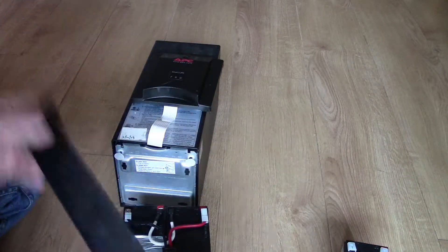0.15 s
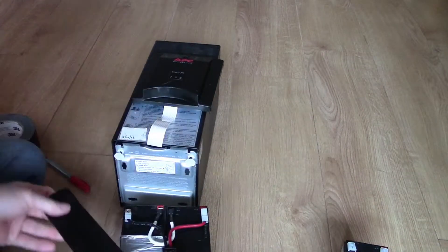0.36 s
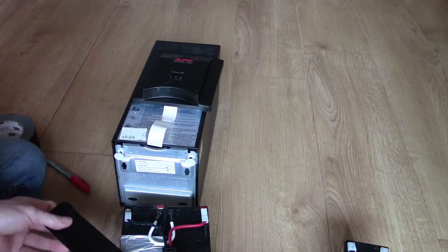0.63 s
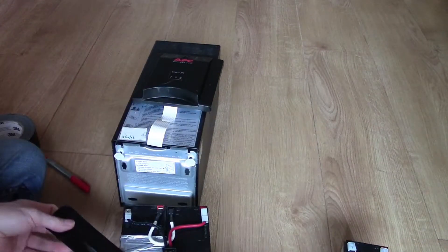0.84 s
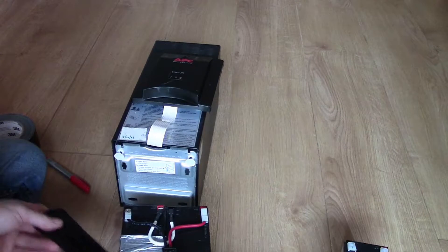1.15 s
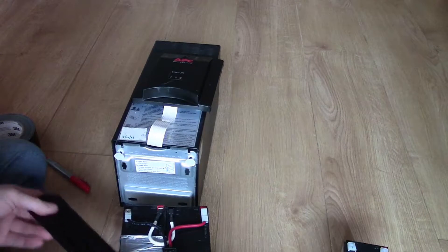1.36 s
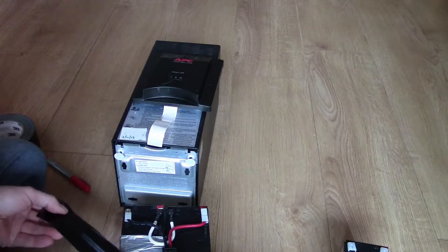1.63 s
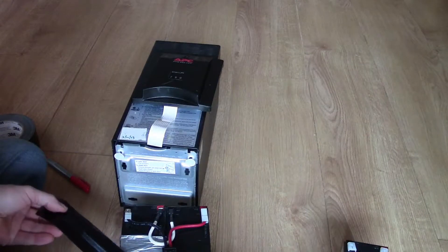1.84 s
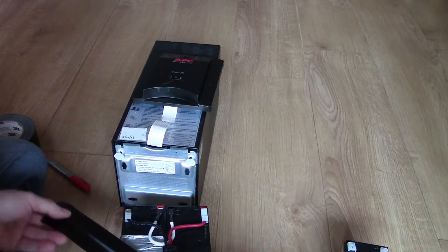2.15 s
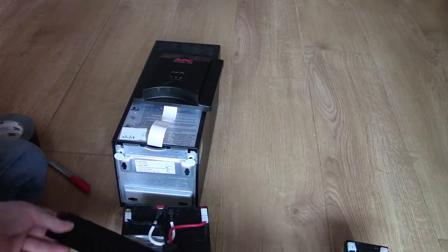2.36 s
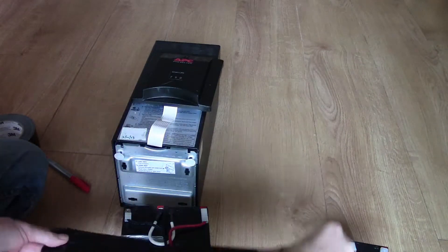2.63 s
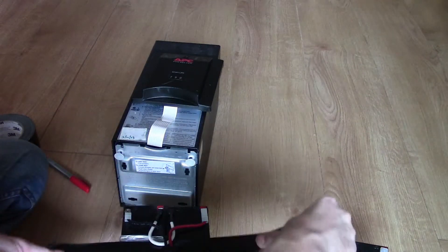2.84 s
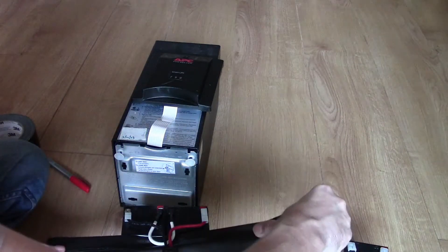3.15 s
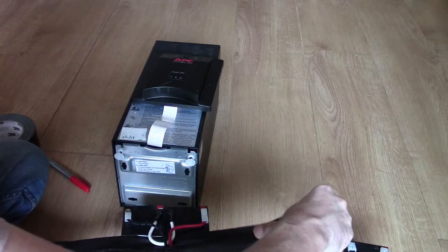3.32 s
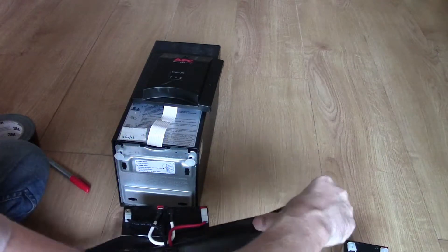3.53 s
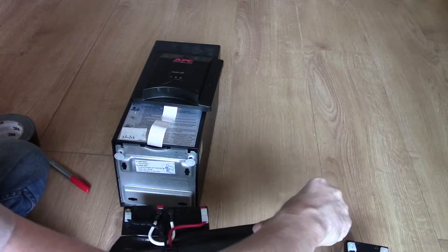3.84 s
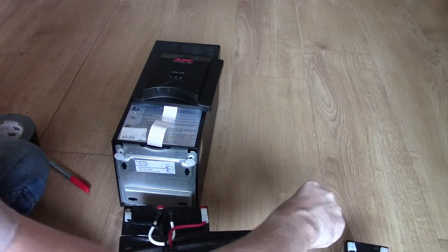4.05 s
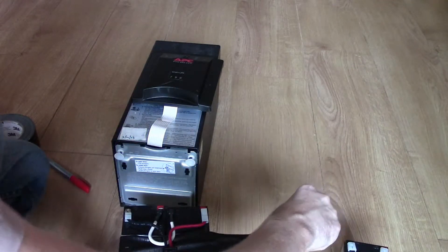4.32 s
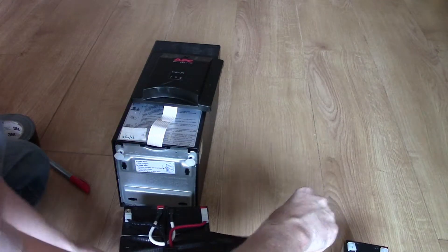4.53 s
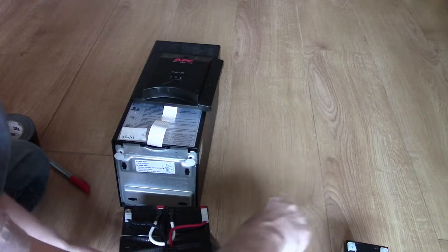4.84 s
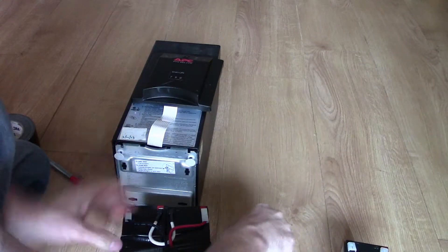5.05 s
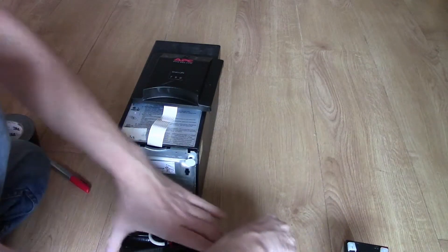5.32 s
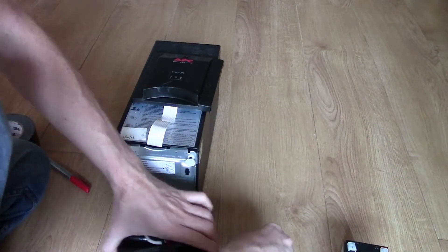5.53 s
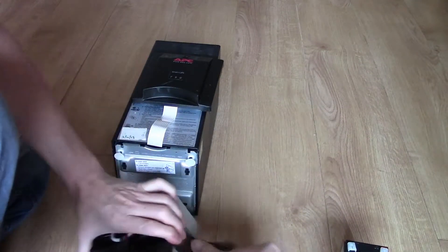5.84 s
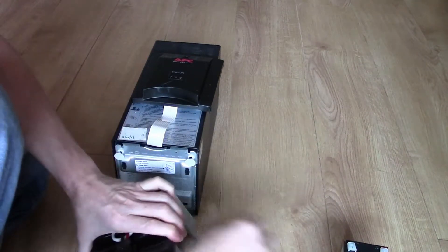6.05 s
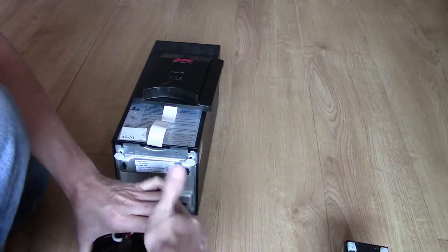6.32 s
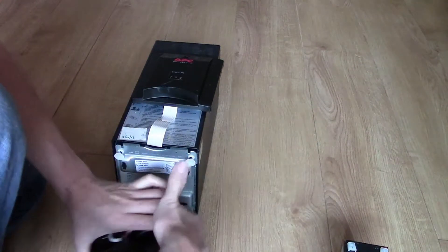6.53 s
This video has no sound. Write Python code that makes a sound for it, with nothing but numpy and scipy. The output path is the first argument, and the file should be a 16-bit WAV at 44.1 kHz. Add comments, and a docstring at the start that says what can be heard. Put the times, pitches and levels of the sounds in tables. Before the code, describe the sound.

A close stereo microphone in a bare room with a short, sparse echo and quiet, slightly patchy hiss. At 0.03 s a small bright tape snap with a light tap, then soft rustling near 0.2 s and a faint falling skin squeak at 0.75 s. At 1.18 s a sharp tick, and at 1.23 s by far the loudest event: a hard, clipped crack with a hollow plastic knock, ringing off the walls. A faint squeak at 1.75 s, then airy tape sliding from 1.8 to 2.8 s, with a click at 2.43 s. Quiet sparse ticks follow. Between 4.27 and 4.6 s come clustered snaps and a brisk rustle. From 5.45 s pressing brings small clicks, dull rubs and low knocks, with a stronger double snap at 5.91 s. Two tiny squeaks at 6.44 and 6.57 s and soft knocks at 6.66 s end it.

```python
"""Sticky tape pulled taut lets go in snaps: each release is a wide crack that excites a ring in the tape.
Hands press it round a plastic pack: the drawn strip whistles with friction, skin sticks and slips,
dense tiny releases rustle over a dull rub, and knocks sound the short modes of the hollow plastic.
A bare room answers with a decaying tail of sparse echoes, over a quiet, gently patchy stereo hiss."""
import sys
import numpy as np
from scipy import signal
from scipy.fft import rfft, irfft
from scipy.io import wavfile
from scipy.ndimage import uniform_filter1d

SR = 44100
rng = np.random.default_rng(int(sys.argv[2]) if len(sys.argv) > 2 else 0)


def digitize_waveform(pressure):
    """Quantize a signal to 16-bit integers and store it at the path in sys.argv[1].

    Rows of a 2-D input are taken as channels; values are limited to [-1, 1].
    """
    field = np.atleast_2d(pressure).T
    bounded = np.clip(field, -1, 1)
    quanta = np.round(bounded * 32767).astype(np.int16)
    wavfile.write(sys.argv[1], SR, quanta)


N = 294588

# Glue letting go: start_s, peak_db, tape_pitch_hz, crack_re_ring_db, t60_ms; the row at 0.033 s is no release
# but the long 1080 Hz ring of the first knock on the pack
GLUE_SNAPS = [(0.0275, -20.5, 3190, -13, 5.9), (0.033, -39, 1080, -21, 77), (0.222, -39, 2470, -5, 13),
              (0.512, -36, 7300, -2, 13), (0.7238, -39.5, 7540, -5, 11), (0.7343, -36, 7200, -5, 11),
              (0.8418, -37, 2600, 3, 9), (1.016, -37, 3140, 0, 9.7), (1.0528, -36.5, 7600, -2, 20),
              (1.106, -30.5, 8250, 2, 13), (1.18, -12, 7350, 11, 12), (1.2026, -39, 4400, -3, 11),
              (1.2314, -0.5, 3240, 7, 13.4), (1.2361, -4.5, 2650, -13, 19), (2.1053, -34.5, 7800, 0, 24),
              (2.1676, -39.5, 7950, -3, 20), (2.3628, -32.5, 6670, 8, 10), (2.422, -28, 3400, -3, 12),
              (2.435, -19, 2680, -0.5, 8.4), (2.6802, -36.5, 3800, 15, 20), (3.0462, -36, 6440, 6, 17),
              (3.2, -36.5, 4080, -0.5, 23), (3.3319, -36, 3400, 10, 12), (3.3973, -33.5, 2670, 12, 20),
              (3.4235, -31.5, 2600, 15, 11), (3.6772, -37, 3460, 1, 18), (3.697, -36.5, 4300, 1.5, 25),
              (3.9213, -32.5, 3660, 4.5, 11), (3.9694, -40, 8200, -6, 12), (4.242, -38.5, 3640, 8, 18),
              (4.2629, -33, 2400, 6, 25), (4.271, -16, 2320, 1.5, 17), (4.2822, -28, 2400, -5, 55),
              (4.29, -27, 2450, 3, 26), (4.305, -26, 2400, -4, 13), (4.3089, -14, 2370, -5, 22),
              (4.4896, -33, 2760, -3, 23), (4.494, -26, 2700, -20, 13), (4.5007, -19, 5740, -3, 11),
              (4.5035, -17, 3070, -8.5, 7.3), (4.511, -19, 2650, -9, 6.2), (4.585, -33.5, 2700, -2, 18),
              (4.6001, -26.5, 2520, 4, 24), (4.6138, -28.5, 2500, 3, 16), (4.8012, -44, 2250, -1, 17),
              (4.8876, -40.5, 7500, 4, 25), (4.9956, -35.5, 7500, 12, 7.2), (5.1536, -31.5, 2840, 16, 10),
              (5.443, -41, 2700, 2.5, 12.5), (5.4801, -26, 3570, 6, 9.7), (5.4838, -23, 3700, -1, 11),
              (5.5097, -31, 4530, 5, 15), (5.586, -40.5, 3350, -10, 74), (5.594, -34.5, 7280, 3, 5.9),
              (5.78, -33, 2200, 4, 14), (5.7894, -32, 6200, -9, 8.7), (5.7941, -26.5, 1940, -4, 11),
              (5.8983, -24, 6800, -15, 24), (5.9077, -16, 2140, 12, 9.8), (5.9133, -13, 4100, 10, 3.3),
              (6.1684, -27.5, 2700, -4.5, 6.8), (6.2017, -33.5, 7200, 2, 16), (6.3168, -28.5, 7760, 11, 13),
              (6.5285, -41, 2540, -15, 20)]
# Relative spectrum of the crack: frequency_hz, density_db
CRACK_SPECTRUM = [(300, -42), (1000, -3), (2000, -2.5), (3200, 0.5), (5000, 0), (7700, 1.5), (11000, -5.5),
                  (14000, -13), (16500, -29)]
SNAP_TO_WALLS_DB, RING_WIDTH = -7, 0.28  # level re the direct snap; widest ring as a share of its pitch
# Small releases at chance moments: their peaks lie between FAINT_DB and FAINT_DB + FAINT_SPREAD_DB
FAINT_SNAPS, FAINT_DB, FAINT_SPREAD_DB, FAINT_HZ, FAINT_T60_MS = 24, -49, 5, (2200, 8000), 12

# Strip drawn through the fingers, one list a pull: time_s, level_db, lowest_whistle_hz, top_whistle_extra_db
TAPE_PULLS = [
    [(1.78, -69, 3950, -12), (1.93, -63, 4000, -19), (2.05, -67.5, 3900, -13), (2.17, -62.5, 4000, -2),
     (2.29, -60, 3920, 8), (2.42, -60, 3660, -7), (2.54, -59, 4060, -13), (2.66, -64, 3630, -5),
     (2.8, -67, 3630, -7)],
    [(2.94, -73, 3700, -9.5), (3.025, -49.5, 3450, 0), (3.1, -78, 3320, -12)],
    [(3.68, -68.5, 3340, -9), (4.22, -71, 3270, -23)],
    [(4.46, -68, 3000, -13.5), (4.5, -51, 2950, -8.5)],
    [(5.785, -56.5, 3050, -8), (5.832, -53, 3180, -2)],
    [(6.36, -73, 3300, -8), (6.4, -56, 3400, 7), (6.44, -54, 3480, -1)],
]
# Whistles of the gap between skin and tape: pitch_ratio, width_hz (of one resonator pass), level_db
GAP_WHISTLES = [(1, 450, -8), (2, 1500, -0.5), (2.65, 1600, -7)]

# Skin stuttering over the tape: start_s, peak_db, length_s, first_pitch_hz, last_pitch_hz,
# second_ring_hz, slip_rate_hz, fizz_db, fade_over_length_db
SKIN_SQUEAKS = [(0.753, -40.5, 0.12, 1970, 1430, 2660, 450, 0.5, -10),
                (1.754, -39, 0.072, 2280, 1450, 5530, 400, 1.5, -7),
                (6.4354, -23, 0.017, 2430, 1770, 3210, 340, -4.5, -9),
                (6.565, -24.5, 0.023, 2250, 3100, 1680, 250, -7, 2.5)]

# Hands working the tape, one row a stroke: peak_s, rustle_db, rustle_pitch_hz, dull_rub_db,
# swell_s (to rise 20 dB), fade_s (to fall 20 dB); times below 0.002 s act as 0.002 s
HAND_STROKES = [(0.05, -66, 2850, -69, 4, 2.5), (0.203, -49, 3220, -56, -0.25, 0.04),
                (0.4, -62, 2660, -71, 2, 1.3), (0.756, -49.5, 2450, -60, 0.03, 0.15),
                (1.16, -58.5, 7200, -72, 0.4, 0.86), (1.748, -46.5, 2150, -61, -0.04, 0.05),
                (2.42, -51, 3710, -62.5, 0.4, 0.6), (3.0, -59, 6400, -64.5, 0.7, 0.4),
                (3.44, -66, 3400, -52, -0.1, -0.17), (3.85, -60, 3300, -64, 0.9, .5),
                (4.499, -37.5, 2940, -53, 0.02, 0.1), (4.588, -51, 2800, -58, 0.19, 0.43),
                (5.158, -62, 9700, -58.5, 0.26, 0.2), (5.37, -59.5, 7400, -68, -0.26, 0.3),
                (5.47, -55.5, 2490, -58, 0.5, 0.18), (5.76, -49.5, 2300, -61, 0.02, 0.24),
                (5.823, -49, 6700, -47.5, 0.03, -0.2), (5.883, -61, 2400, -49.5, -0.06, .05),
                (6.19, -57, 3000, -59, 0.44, 0.26), (6.307, -68, 5300, -46.5, .01, 0.07),
                (6.43, -49.5, 6160, -74, -0.15, -0.05), (6.51, -51.5, 2080, -58, 0.34, -0.56),
                (6.596, -49, 2100, -72, 0.06, 0.6), (6.68, -49.5, 2104, -50.5, 0.16, .05)]
FIDGET_DB, FIDGET_RUB_DB, FIDGET_HZ = -68.5, -68, 2400  # the hands are never quite still
# Relative spectrum of the rustle: frequency_hz, density_db
RUSTLE_SPECTRUM = [(590, -0.5), (1000, -7), (1670, 7.5), (1960, 0), (4020, 3.5), (5130, 0.5), (10500, -5),
                   (14200, -13), (16000, -50)]
# Relative spectrum of palms on plastic: frequency_hz, density_db
RUB_SPECTRUM = [(100, -63), (300, 4.5), (900, 10), (1800, 0.0), (4000, -63)]

# Fingers and tape knocking the pack: start_s, peak_db (before the bass cut), pitch_hz
PACK_KNOCKS = [(0.034, -36, 1050), (0.467, -43, 322), (1.144, -42.5, 785), (1.202, -33, 1140),
               (1.236, -4.5, 1102), (2.435, -26.5, 704), (2.437, -28.5, 1170), (3.422, -45, 297),
               (4.505, -29.5, 1290), (4.615, -38, 386), (5.485, -37.5, 450), (5.586, -36, 2000),
               (5.779, -42, 1140), (5.796, -35.5, 615), (5.821, -35, 900), (5.879, -34.5, 496),
               (5.9, -35, 940), (5.908, -31.5, 730), (5.983, -39.5, 855), (6.191, -37, 320),
               (6.303, -34.5, 460), (6.648, -38.5, 540), (6.658, -29.5, 460), (6.668, -28, 530)]
# Modes of the hollow pack: pitch_ratio, level_db, t60_ratio
PACK_MODES = [(1.07, 9.5, 0.61), (2.313, -5, 0.99), (1.376, -4.5, 0.36), (0.65, 1.5, 0.85),
              (0.512, -5.5, 0.66), (0.346, -7, 1.3)]
KNOCK_T60_S, KNOCK_SLOPE = 0.015, -0.71  # t60 at 1 kHz and its power of pitch: low spots ring longer

# Decay of the room: frequency_hz, t60_s
ROOM_T60 = [(200, 0.26), (530, 0.34), (1390, 0.3), (3680, 0.36), (9700, 0.3)]
# Relative spectrum of the tail before decay: frequency_hz, level_db
TAIL_SPECTRUM = [(200, 3.5), (2000, -6.0), (6000, -5.5), (9000, -9), (15000, -5.5)]
# Part of the tail that differs between left and right: frequency_hz, gain_db
TAIL_DIFFERENCE = [(150, -18), (1000, -37), (3000, -22.0), (12000, -16)]

# Relative spectrum of the hiss: frequency_hz, density_db
HISS_SPECTRUM = [(12, -20), (20, -5), (43, -29), (156, -26.5), (323, -28), (393, -27.5), (750, -32.5),
                 (888, -35.5), (1510, -37), (1650, -36.5), (4790, -44.5), (14300, -51.5), (16500, -59)]
HISS_DB = -55.5  # rms
# Left-right likeness of the hiss: frequency_hz, correlation (1 is identical)
HISS_LIKENESS = [(60, 1), (130, 0.18), (290, -0.34), (640, -0.34), (1410, 0.017), (3100, 0.44),
                 (6820, 0.51), (15000, 0.49)]

OFFSET = 0.0096  # the preamp rests a little above zero
EDGE_HZ = 16500


def gain_of(db):
    """Converts decibels to an amplitude ratio."""
    return 10 ** (np.asarray(db) / 20)


def evened(x):
    """Scales to rms 1."""
    return x / np.sqrt(np.mean(x ** 2) + 1e-20)


def peaked(x):
    """Scales to peak 1."""
    return x / (abs(x).max() + 1e-20)


def read(points, hz):
    """Interpolates a spectrum table on a log-frequency axis."""
    f, value = np.transpose(points)
    return np.interp(np.log(hz + 1), np.log(f + 1), value)


def add(mix, s, sound):
    """Superposes a sound on the mix at time s."""
    part = mix[round(s * SR):][:len(sound)]
    part += sound[:len(part)]


def colour(x, points):
    """Zero-phase filtering: multiplies the spectrum by a table of gains."""
    hz = np.fft.rfftfreq(len(x), 1 / SR)
    return irfft(rfft(x) * gain_of(read(points, hz)), len(x))


def smoothed_twice(x, size):
    """Moving average applied twice, which gives a triangular window."""
    return uniform_filter1d(uniform_filter1d(x, size=size), size=size)


def resonate(x, hz, width):
    """Heterodyne resonance of gain 1: shifts hz down to zero, smooths, and shifts back."""
    turn = np.exp(2j * np.pi * np.cumsum(hz * np.ones(len(x))) / SR)
    r = np.exp(-np.pi * width / SR)
    return 2 * (turn * signal.lfilter([1 - r], [1, -r], x / turn)).real


def resonate_twice(x, hz, width):
    """Two equal resonances in cascade, for steeper skirts."""
    return resonate(resonate(x, hz, width), hz, width)


def snaps():
    """Impulsive excitation: a wide crack and the taut tape's damped ring; returns direct and wall-bound sound."""
    direct, to_walls = np.zeros((2, N))
    t, centre = np.arange(2048) / SR, 256
    low_hz, high_hz = FAINT_HZ
    faint = [(a * N / SR, FAINT_DB + FAINT_SPREAD_DB * b, low_hz * (high_hz / low_hz) ** c, 0, FAINT_T60_MS)
             for a, b, c in rng.random((FAINT_SNAPS, 3))]
    for s, db, hz, crack_db, t60_ms in GLUE_SNAPS + faint:
        noise = rng.choice([-1., 1.], len(t))
        decay = gain_of(-60000 * t / max(t60_ms, 2)) * (1 - np.exp(-t / .0001))
        crack = evened(colour(noise, CRACK_SPECTRUM)) * gain_of(-60 * t / 0.33)  # dies a little sooner
        width = min(RING_WIDTH * hz, 22000 / max(t60_ms, 2))  # long rings are purer
        ring = evened(resonate_twice(noise, hz, width))
        snap = gain_of(db) * peaked(decay * (ring + gain_of(crack_db) * crack))
        add(direct, max(s - .0002, 0), snap)

        # over all directions the colour evens out
        click = signal.unit_impulse(len(t), centre)
        wide_ring = evened(resonate_twice(click, hz, 0.68 * hz))
        wide_crack = gain_of(crack_db + 8.5) * evened(colour(click, CRACK_SPECTRUM))
        spread = evened(wide_ring + wide_crack)
        add(to_walls, max(s - centre / SR, 0), gain_of(SNAP_TO_WALLS_DB) * np.std(snap) * spread)
    return direct, to_walls


def unroll(rows):
    """Interpolates a gesture at sample rate; returns its start time, an edge fade and its columns."""
    s, *columns = np.transpose(rows)
    t = np.arange(s[0], s[-1], 1 / SR)
    fade = np.clip(np.minimum(t - s[0], s[-1] + 0.004 - t) / 0.004, 0, 1)
    return s[0], fade, [np.interp(t, s, c) for c in columns]


def slides():
    """Friction noise through resonances of the gap: three fuzzy, patchy whistles."""
    out = np.zeros(N)
    for rows in TAPE_PULLS:
        s, fade, (db, hz, top_db) = unroll(rows)
        for (ratio, width, whistle_db), extra_db in zip(GAP_WHISTLES, (0, 0, top_db)):
            noise, patch, drift = rng.standard_normal((3, len(fade)))
            flutter = 0.054 * evened(smoothed_twice(drift, 1800))  # the gap flutters
            pitch = ratio * hz * (1 + flutter)
            patch_db = 3.3 * evened(smoothed_twice(patch, 900))
            band = evened(resonate_twice(noise, pitch, width))
            add(out, s, fade * gain_of(db + whistle_db + extra_db + patch_db) * band)
    return out


def squeaks():
    """Stick-slip friction: noise throbs at the slip rate through a gliding ring, with wide fizz."""
    out = np.zeros(N)
    for s, db, length, from_hz, to_hz, second_hz, slips, fizz_db, fade_db in SKIN_SQUEAKS:
        t = np.arange(0, length, 1 / SR)
        noise = rng.standard_normal(len(t)) * (0.38 + np.sin(np.pi * slips * t) ** 2)
        glide = to_hz + (from_hz - to_hz) * np.exp(-t / (0.23 * length))
        rings = ((glide, 450, 0), (second_hz, 600, -6), (7800, 900, -15))  # pitch_hz, width_hz, level_db
        sound = gain_of(fizz_db) * evened(colour(noise, CRACK_SPECTRUM))
        for hz, width, ring_db in rings:
            sound += gain_of(ring_db) * evened(resonate_twice(noise, hz, width))
        edges = np.clip(np.minimum(t / 0.0031, (length - t) / 0.0066), 0, 1)
        add(out, s, gain_of(db) * peaked(sound * edges * gain_of(fade_db * t / length)))
    return out


def handling():
    """Superposed random events: dense tiny glue releases rustle; palms on plastic rub, dull and lumpy."""
    t = np.arange(N) / SR
    rustle_level, rub_level, hz = gain_of(FIDGET_DB), gain_of(FIDGET_RUB_DB), FIDGET_HZ
    for s, db, stroke_hz, rub_db, swell, fade in HAND_STROKES:
        shape = gain_of(-20 * np.maximum((s - t) / max(swell, .002), (t - s) / max(fade, .002)))
        stroke_level = gain_of(db) * shape
        # a stroke sets the pitch where it outweighs all earlier rows together
        hz = np.where(stroke_level > rustle_level, stroke_hz, hz)
        rustle_level = np.hypot(rustle_level, stroke_level)
        rub_level = np.hypot(rub_level, gain_of(rub_db) * shape)

    noise, rub, clump, lump = rng.standard_normal((4, N))
    bunched = noise * gain_of(1.4 * evened(uniform_filter1d(clump, size=130)))  # releases come in bunches
    lumpy = rub * gain_of(3.3 * evened(uniform_filter1d(lump, size=500)))
    ring = evened(resonate_twice(bunched, hz, 1500))
    rustle = evened(evened(colour(bunched, RUSTLE_SPECTRUM)) + gain_of(-10) * ring)
    dull = evened(colour(lumpy, RUB_SPECTRUM))
    return rustle_level * rustle + rub_level * dull


def knocks():
    """Modal synthesis: a knock rings the hollow plastic's short modes, scaled to the spot struck."""
    out, t = np.zeros(N), np.arange(6000) / SR
    for s, db, hz in PACK_KNOCKS:
        t60 = KNOCK_T60_S * (hz / 1000) ** KNOCK_SLOPE
        ring = np.zeros(len(t))
        for ratio, mode_db, longer in PACK_MODES:
            decay = gain_of(mode_db - 60 * t / max(t60 * longer, .002))
            ring += decay * np.sin(2 * np.pi * hz * ratio * t)
        add(out, s, gain_of(db) * peaked(ring * (1 - np.exp(-t / 0.0011))))
    # a small box radiates no deep bass
    return signal.sosfilt(signal.butter(2, 140, "high", fs=SR, output="sos"), out)


def room(x):
    """Reverberation by convolution: sparse taps die band by band, nearly alike in the two close ports."""
    taps = rng.choice([-1., 1.], (2, SR // 2)) * (rng.random((2, SR // 2)) < .12)
    taps[:, :round(.006 * SR)] = 0  # gap before the first echo
    hz, t, z = signal.stft(taps, SR, nperseg=256)
    z *= gain_of(-60 * t / read(ROOM_T60, hz)[:, None] + read(TAIL_SPECTRUM, hz)[:, None])
    common, apart = signal.istft(z, SR, nperseg=256)[1]
    apart = colour(apart, TAIL_DIFFERENCE)
    tail = np.array([common + apart, common - apart]) / np.linalg.norm(common)
    return signal.fftconvolve(x[None], tail, axes=1)[:, :N]


def hiss():
    """Partly correlated noise: room air and microphone noise, gently patchy in time and frequency."""
    frames, hz = N // 256 + 5, np.fft.rfftfreq(1024, 1 / SR)
    a, b, c, d, patches = rng.standard_normal((5, 513, frames))
    patches = evened(uniform_filter1d(uniform_filter1d(patches, size=12, axis=0), size=14, axis=1))
    same = np.clip(read(HISS_LIKENESS, hz), -1, 1)[:, None]
    left = a + 1j * b
    right = same * left + np.sqrt(1 - same ** 2) * (c + 1j * d)
    z = np.array([left, right]) * gain_of(read(HISS_SPECTRUM, hz)[:, None] + 1.67 * patches)
    return gain_of(HISS_DB) * evened(signal.istft(z, nperseg=1024, noverlap=768)[1][:, :N])


def scene():
    """Superposition: direct sounds reach both ports alike; each source also feeds the room."""
    snap, snap_to_walls = snaps()
    soft = slides() + handling()
    squeak, knock = squeaks(), knocks()
    to_room = snap_to_walls + gain_of(-10) * knock + gain_of(-10.5) * squeak + gain_of(-14.5) * soft
    return snap + knock + squeak + soft + room(to_room) + hiss()


def record(dry):
    """Offset, gain reduction above a power threshold, overload clipping, then the band limit."""
    x = dry + OFFSET
    # origin=99 makes each 200-sample average look back only
    power = uniform_filter1d((x ** 2).mean(0), size=200, origin=99)
    power_db = 10 * np.log10(abs(power) + 1e-12)
    fall = np.arange(N) * 130 / SR  # the held peak falls 130 dB a second
    held_db = np.maximum.accumulate(power_db + fall) - fall
    over_db = np.maximum(held_db + 16.0, 0)  # threshold -16 dB
    ducked = x / gain_of(.7 * uniform_filter1d(over_db, size=200, origin=99))
    limited = np.clip(ducked, -.9, .9)
    padded = np.pad(limited, ((0, 0), (255, 255)), "reflect")
    low_pass = signal.firwin(511, EDGE_HZ, window=("kaiser", 9), fs=SR)
    return signal.oaconvolve(padded, low_pass[None], "valid", axes=1)


dry = scene()
out = record(dry)
digitize_waveform(out)
```